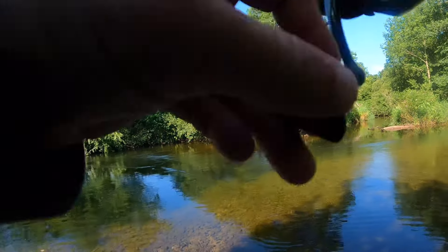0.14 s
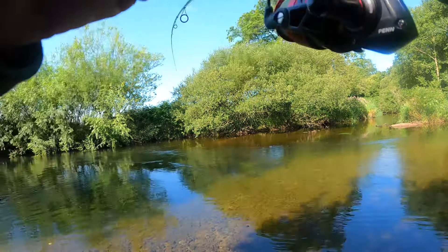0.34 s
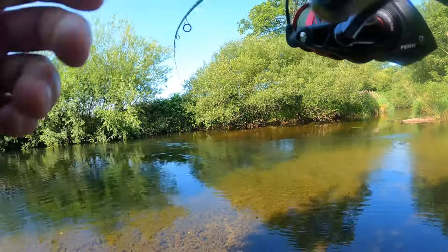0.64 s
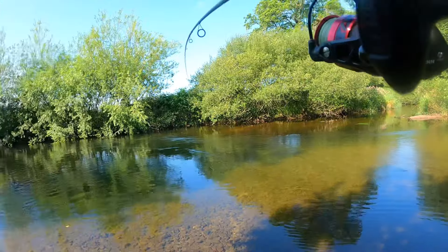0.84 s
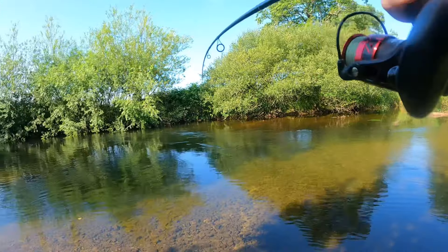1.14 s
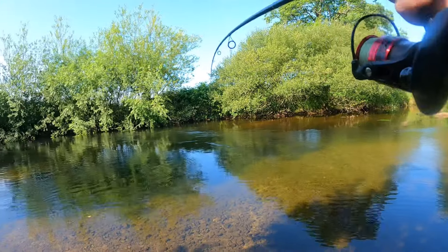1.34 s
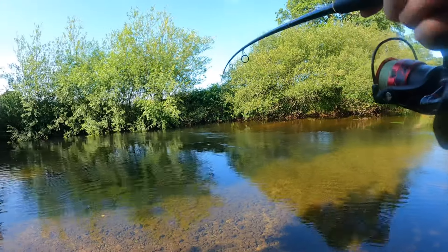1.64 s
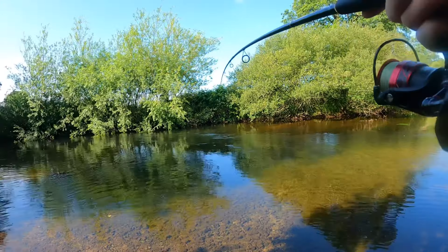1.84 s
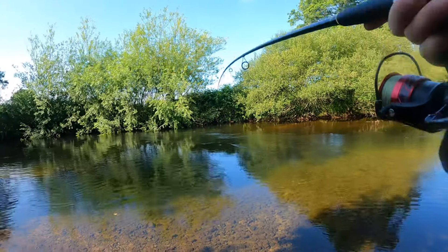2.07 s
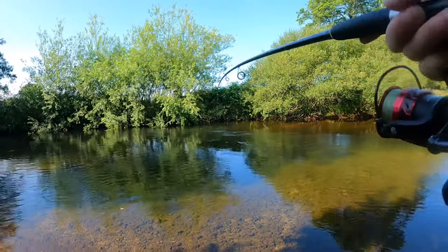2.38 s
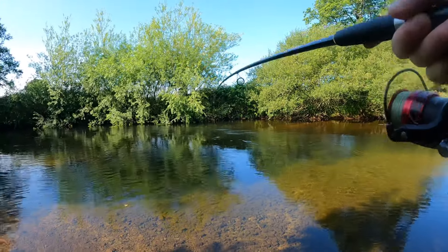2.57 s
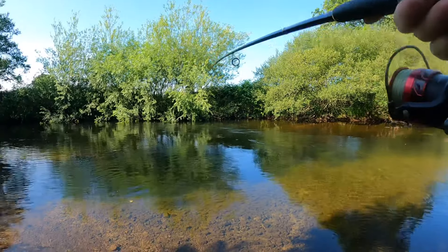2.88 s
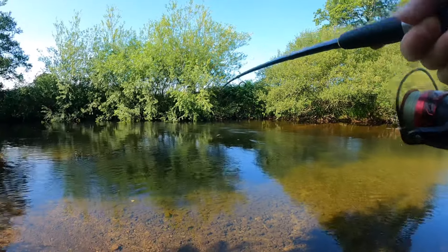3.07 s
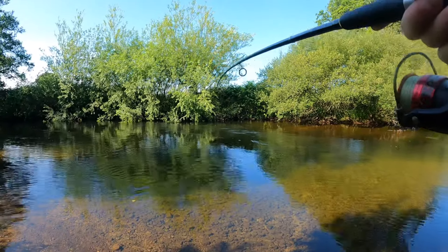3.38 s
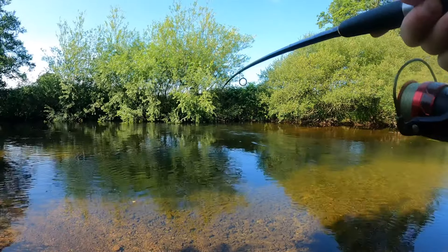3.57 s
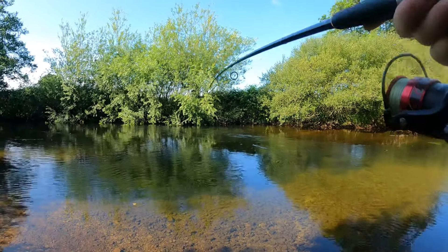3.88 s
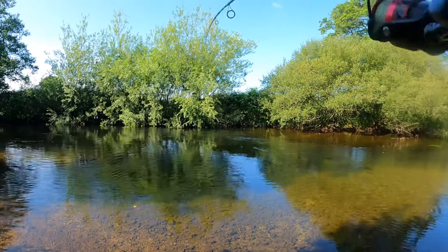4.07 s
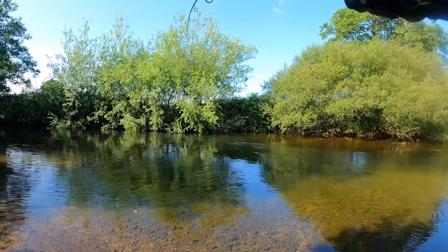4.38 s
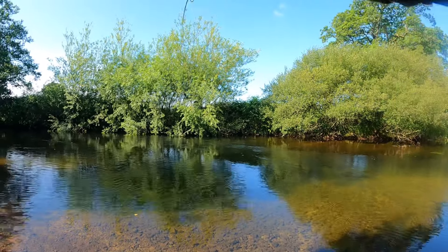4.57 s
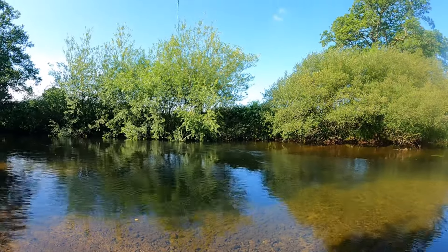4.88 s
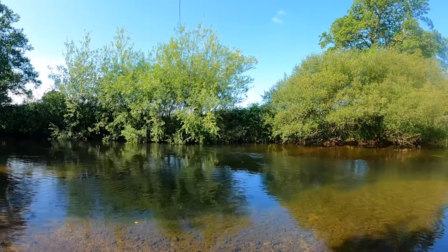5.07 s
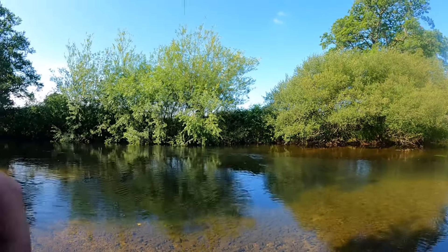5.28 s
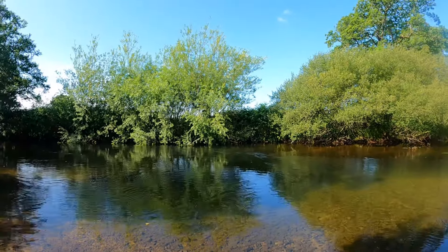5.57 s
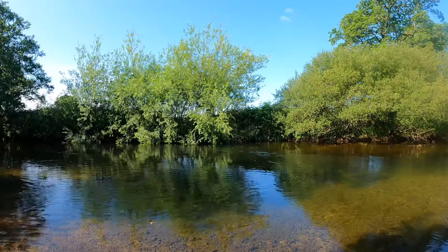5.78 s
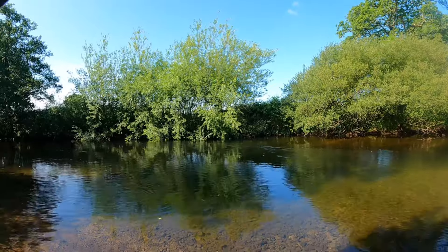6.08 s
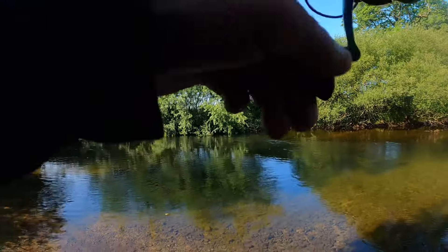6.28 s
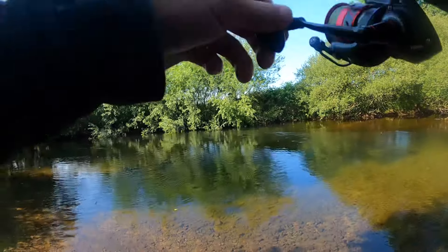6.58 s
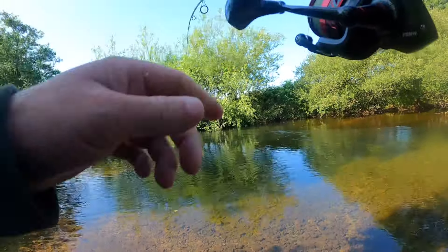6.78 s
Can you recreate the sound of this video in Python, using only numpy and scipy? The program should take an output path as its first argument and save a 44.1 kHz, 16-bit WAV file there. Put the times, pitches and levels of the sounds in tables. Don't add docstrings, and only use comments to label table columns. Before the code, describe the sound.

A fishing reel's drag clicker ratchets in bright, uneven metallic bursts, racing and slowing, pauses, then starts again over quiet river hiss.

```python
import sys
import numpy as np
from scipy import signal
from scipy.fft import rfft, irfft, next_fast_len
from scipy.io import wavfile
from scipy.ndimage import uniform_filter1d

SR = 44100
rng = np.random.default_rng(int(sys.argv[2]) if len(sys.argv) > 2 else 0)


def ratio_of_db(decibels):
    return 10 ** (np.asarray(decibels, float) / 20)


def wav_out(sig):
    wavfile.write(sys.argv[1], SR, np.round(np.clip(np.atleast_2d(sig).T, -1, 1) * 32767).astype(np.int16))


N = 305613
T = np.arange(N) / SR
CONTACT_S = 0.0005


def level(x, db):
    return x * ratio_of_db(db) / np.sqrt(np.mean(x ** 2))


def colour(x, points):
    hz, db = np.transpose(points)
    size = next_fast_len(N)
    f = np.arange(size // 2 + 1) * SR / size + 1
    gain = ratio_of_db(np.interp(np.log(f), np.log(hz), db))
    return irfft(rfft(x, size) * gain, size)[..., :N]


def band(x, hz, width_hz):
    return signal.lfilter(*signal.iirpeak(hz, hz / width_hz, SR), x)


def place(x, pan_db):
    return x * ratio_of_db(np.array([[0.5], [-0.5]]) * pan_db)


def stereo(mid, side):
    return mid + side * np.array([[1], [-1]])


def walk(rate_hz):
    hold = int(SR / rate_hz)
    levels = rng.standard_normal(N // hold + 1)
    return uniform_filter1d(np.repeat(levels, hold), hold)[:N]


def strikes(s, size):
    x = np.zeros(N, np.result_type(size))
    x[(s * SR).astype(int)] = size
    return x


def modes(s, db, table, scatter_db):
    out = 0
    contact = np.exp(-1 / (CONTACT_S * SR))
    for hz, mode_db, t60_s, pan_db in table:
        chance = rng.standard_normal((len(s), 2)).T
        blow_db = db + mode_db + scatter_db * chance[0]
        blows = strikes(s, ratio_of_db(blow_db) * np.exp(2j * chance[1]))
        turn = np.exp(2j * np.pi * hz / SR)
        decay = 1000 ** (-1 / t60_s / SR)
        push = signal.lfilter([1 - contact], [1, -contact * turn], blows)
        out = out + place(signal.lfilter([1], [1, -turn * decay], push).imag, pan_db)
    return out


def ring(s, db, hz, t60_s, pan_db):
    last = np.searchsorted(s, T) - 1
    age_s = T - s[last]
    decay = ratio_of_db(db[last] - 60 * np.abs(age_s) / t60_s)
    envelope = uniform_filter1d(np.where(last >= 0, decay, 0), size=40)
    phase = rng.uniform(0, 2 * np.pi, len(s))
    return place(envelope * np.sin(2 * np.pi * hz * age_s + phase[last]), pan_db)


def burst(s, db, ms, points, alike):
    envelope = np.zeros(N)
    age_s = np.arange(600) / SR
    shape = np.exp(-age_s / (ms / 1000)) * (1 - np.exp(-age_s / CONTACT_S))
    for start, size in zip((s * SR).astype(int), ratio_of_db(db)):
        envelope[start:start + 600] += size * shape
    mid, side = np.sign(rng.standard_normal((2, N)))
    noise = stereo(np.sqrt(alike) * mid, np.sqrt(1 - alike) * side)
    return colour(envelope * noise, points)


# (time [s], speed [teeth/s])
PULL_1 = [(0.0147, 28.1), (0.074, 39.0), (0.102, 32.3), (0.116, 36.4), (0.168, 39.5), (0.258, 94.7),
          (0.317, 91.9), (0.3756, 48.6)]
NUDGES = [
    [(.754, 20)],
    [(1.0502, 20)],
]
PULL_2 = [(1.131, 19.8), (1.172, 29.6), (1.21, 48.1), (1.291, 26.3), (1.388, 24.8), (1.498, 20.7),
          (1.5871, 37.4)]
PULL_3 = [(1.6106, 44.0), (1.674, 50.5), (1.73, 40.1), (1.759, 26.1), (1.838, 49.3), (1.9427, 18.8)]
PULL_7 = [(1.991, 53.9), (2.026, 201.9), (2.068, 86.7), (2.108, 88.3), (2.1263, 21.9)]
PULL_8 = [(2.2523, 116.6), (2.258, 94.9), (2.264, 30.2), (2.273, 179.2), (2.282, 81.3), (2.318, 78.3),
          (2.4195, 1.1)]
PULL_9 = [(2.509, 71.4), (2.531, 158.7), (2.556, 122.9), (2.56, 130.9), (2.565, 76.8), (2.617, 56.0),
          (2.668, 1.4), (2.7076, 54.5)]
PULL_10 = [(2.7766, 69.0), (2.783, 87.8), (2.79, 81.5), (2.851, 14.5)]
PULL_11 = [(3.03, 31.6), (3.081, 223.8), (3.092, 226.4), (3.1486, 22.9)]
PULL_4 = [(3.1667, 52.0), (3.198, 43.3), (3.232, 44.3), (3.297, 17.9), (3.4472, 8.8)]
PULL_5 = [(3.5488, 22.4), (3.621, 46.9), (3.7055, 62.3)]
PULL_12 = [(3.7753, 14.2), (3.785, 41.1), (3.816, 233.7), (3.876, 14.9), (3.9042, 65.7)]
PULL_6 = [(5.9475, 17.0), (6.028, 31.6), (6.074, 14.6), (6.182, 31.9), (6.216, 22.3), (6.263, 43.0),
          (6.3243, 24.3)]
PULL_13 = [(6.3907, 21.3), (6.427, 34.3), (6.471, 53.4), (6.561, 125.9), (6.623, 116.7), (6.6694, 35.9)]
RUNS = [PULL_1, *NUDGES, PULL_2, PULL_3, PULL_7, PULL_8, PULL_9, PULL_10, PULL_11,
        PULL_4, PULL_5, PULL_12, PULL_6, PULL_13]


def snaps():
    rows = []
    for number, run in enumerate(RUNS):
        s, speed = np.transpose(run)
        t = np.arange(s[0], s[-1] + 1 / SR, 1 / SR)
        teeth = np.cumsum(np.interp(t, s, speed)) / SR
        snap_s = np.interp(np.arange(round(teeth[-1]) + 1), teeth, t)
        rows += [(at, number, np.interp(at, s, speed)) for at in snap_s]
    return np.transpose(rows)


# (crack [dB], low ring [dB], high ring [dB], body knock [dB])
GRIP = [(-21, -40.5, -50, -38.0), (-19, -35.5, -51, -41), (-18, -33.5, -60, -39.5),
        (-23, -40.5, -46, -37.5), (-23, -41.5, -49.5, -38.5), (-24, -41.0, -45.5, -36),
        (-22.5, -44.5, -50.5, -37.5), (-23.5, -40.0, -51, -40), (-26, -41, -51, -41.5),
        (-23.5, -43.5, -45, -40.5), (-23, -41.5, -45, -45.5), (-23.5, -42, -47.0, -36.5),
        (-23.0, -37, -43, -39.5), (-24, -41, -53, -41), (-21.5, -46.5, -47, -41.5)]
SPEED_DB = (1.1, 2.6, 2.4, 1.7)
SCATTER_DB = (1.0, 3.5, 3.5, 1.5)
# (slowest that matters, reference, fastest) [teeth/s]
SPEED_RANGE = (33, 50, 300)
# (crack [dB], body knock [dB], cap ring [dB])
TEETH = [(-2.0, -0.1, -2.2), (-0.3, -0.6, -0.3), (1.0, -0.2, 1.9), (1.8, -0.4, 0.2), (0.7, -0.1, -2.8),
         (-0.4, 0.1, -2.6), (-3.7, 1.4, -2.4), (-1.7, 2.5, 2.0), (-1.7, 2.3, 3.8), (1.3, 1.6, 2.6),
         (1.8, -1.3, 1.9), (1.7, -2.6, 2.4), (2.9, -1.2, 1.6), (0.2, -2.1, -2.1), (-1.7, 0.6, -4.0)]
# (frequency [Hz], level [dB])
CRACK = [(600, -11), (1500, -5.5), (3000, -2), (5500, 4.5), (8500, -4.5), (12500, -9), (14500, -25),
         (16500, -54)]
# (frequency [Hz], level under crack [dB], t60 [s], left minus right [dB])
CAP = [(5025, -5.5, 0.014, -1), (6264, -1.5, 0.0037, -2), (3990, -14, 0.0025, -3.5), (7505, -3, 0.0014, 2),
       (9110, -17, 0.0032, -3), (10520, -17, 0.0044, 10.5)]
# (frequency [Hz], level under crack [dB], t60 [s], left minus right [dB])
SPOOL_TOP = [(10775, -30.5, .085, 1.), (13230, -40, .07, 2.)]
# (frequency [Hz], level under body knock [dB], t60 [s], left minus right [dB])
BODY = [(1660, 1.5, 0.017, -1.5), (1785, -9, 0.053, 2), (941, -22.5, 0.21, -0.5), (2520, -13, 0.004, 1)]


def ratchet():
    s, run, speed = snaps()
    slowest, reference, fastest = SPEED_RANGE
    haste = np.log2(np.clip(speed, slowest, fastest) / reference)
    memory = 0.46
    built = signal.lfilter([1 - memory], [1, -memory], haste)
    haste = np.transpose([haste, built, built, haste])
    chance = rng.standard_normal((len(s), 4))
    db = np.array(GRIP)[run.astype(int)] + haste * SPEED_DB + chance * SCATTER_DB
    base_db, low_db, high_db, body_db = db.T
    tooth_db, knock_db, cap_db = np.array(TEETH)[np.arange(len(s)) % len(TEETH)].T
    crack_db = base_db + 1.3 * tooth_db + 2.0

    crack = burst(s, crack_db + 11.0, 0.38, CRACK, alike=0.91)
    rattle = burst(s, crack_db - 12, 2.6, CRACK, alike=0.83)
    low = ring(s, low_db + 3.0, hz=4306, t60_s=0.13, pan_db=-0.059)
    high = ring(s, high_db + 2.5, hz=6640, t60_s=0.25, pan_db=0.0)
    cap = modes(s, base_db + cap_db, CAP[:1], scatter_db=4.0)
    cap = cap + modes(s, crack_db, CAP[1:], scatter_db=2.5)
    top = modes(s, crack_db, SPOOL_TOP, scatter_db=4.5)
    body = modes(s, body_db + knock_db, BODY, scatter_db=2.5)
    return crack + rattle + low + high + cap + top + body


# (time [s], moving resonance [Hz], level [dB])
RUB = [(0.061, 620.2, -58), (.15, 950, -44), (0.198, 1546, -44.5), (.28, 1000, -46.5), (.35, 700, -56),
       (0.419, 695.6, -110),
       (6.031, 904.4, -70), (6.08, 954, -50), (6.121, 1653, -52), (6.182, 1981, -46),
         (6.271, 1616, -50.5), (6.351, 1602, -53),
       (6.399, 1500, -42.5), (6.449, 1637, -45.5), (6.549, 1484, -50), (6.659, 1620, -58)]


def drag_rub():
    s, hz, db = np.transpose(RUB)
    turns = np.cumsum(np.interp(T, s, hz)) / SR
    parts = [(turns, 130.0, 0), (2250 * T, 90.0, -9), (1500 * T, 900.0, -6), (3800 * T, 900.0, -9)]
    out = 0
    for cycles, width_hz, part_db in parts:
        slips = signal.lfilter(*signal.butter(2, width_hz, fs=SR), rng.standard_normal((2, N)))
        angle = 2 * np.pi * cycles
        wave = slips[0] * np.cos(angle) + slips[1] * np.sin(angle)
        out = out + level(wave * ratio_of_db(3.5 * walk(50)), part_db)
    return out * ratio_of_db(np.interp(T, s, db, left=-90, right=-90) + 0.5)


# (time [s], tick [dB], thud [dB])
KNOCKS = [(0.4968, -26.5, -31), (0.532, -26.5, -33.5), (0.541, -25.5, -52), (0.544, -41, -38),
          (0.555, -42, -39), (0.58, -45, -39), (1.15, -33, -47), (2.067, -29, -32.5), (2.325, -37, -30.5),
          (2.5802, -28, -31.5), (2.8441, -28.5, -34.5), (2.8554, -35, -36), (2.9436, -46.5, -44),
          (3.8643, -30.5, -30), (3.8728, -30, -40), (3.9503, -35.5, -46), (3.973, -32, -39),
          (3.977, -37, -42), (5.263, -47, -63), (5.2915, -48, -39.5), (5.6949, -36.5, -32.5),
          (5.7001, -32, -32.5), (5.7056, -43, -34.5), (5.778, -35, -39.5), (5.7846, -36.5, -35),
          (5.7872, -30, -36.5), (5.8306, -19, -27), (6.234, -23, -30.5), (6.383, -36, -33.5),
          (6.7502, -44, -51)]


def knocks():
    s, tick_db, thud_db = np.transpose(KNOCKS)
    tick_hz_db = [(1500, -31.0), (3000, 5.0), (4200, 4.5), (6500, 1.0), (9500, -17.0), (14000, -32.0)]
    thud_hz_db = [(300, -7), (1000, -2.0), (1700, 1), (2500, -1.5), (4000, -45)]
    tick = burst(s, tick_db + 13, 0.68, tick_hz_db, alike=0.87)
    thud = burst(s, thud_db + 10.5, 4.24, thud_hz_db, alike=0.97)
    return tick + thud + modes(s, tick_db, [(4260, 1.2, 0.0071, 0.0)], scatter_db=1)


# (frequency [Hz], density [dB per Hz])
RIVER = [(110, -16), (160, -4), (270, 0), (500, -0.5), (1000, -4), (1700, -11), (2500, -19.5), (3400, -29),
         (4600, -27.5), (6500, -31), (8500, -44), (13500, -50), (14300, -65)]
# (frequency [Hz], left minus right [dB])
RIVER_PAN = [(150, -4.5), (400, 1.5), (1300, 8), (2400, 6), (4400, 2.5)]


def river(db, hiss_db):
    out = 0
    pan_hz, pan_db = np.transpose(RIVER_PAN)
    for hz in 141 * 2 ** np.arange(0, 6.8, 0.5):
        edges_hz = hz * 2 ** np.array([-0.25, 0.25])
        sos = signal.butter(2, edges_hz, "band", fs=SR, output="sos")
        high = np.clip(np.log2(hz / 900) / 2.2, 0, 1)
        gain_db = (1 - high) * db + high * (hiss_db - 55) + (2.4 - high) * walk(6)
        mid, side = signal.sosfilt(sos, rng.standard_normal((2, N)))
        pair = stereo(mid, (0.3 + 0.18 * high) * side)
        out = out + place(ratio_of_db(gain_db) * pair, np.interp(np.log(hz), np.log(pan_hz), pan_db))
    return colour(out, RIVER) * ratio_of_db(15.5)


# (time [s], level [dB])
THUMPS = [(0.28, -55), (0.39, -61), (1.75, -60), (3.07, -62), (5.91, -60), (6.25, -61)]


def wind():
    rumble_hz_db = [(12, -15.0), (25, 2), (40, -9), (60, -7.5), (100, -20.5), (200, -69.5)]
    mid, side = colour(rng.standard_normal((2, N)), rumble_hz_db)
    rumble = ratio_of_db(6.1 * walk(9.4)) * level(stereo(mid, 0.38 * side), -74)
    beats_s = np.arange(0.187, N / SR, 0.4265)
    beats_db = -57 + 2.1 * rng.standard_normal(len(beats_s))
    s, db = np.transpose(THUMPS + list(zip(beats_s, beats_db)))
    age_s = np.arange(-2000, 2001) / SR
    thump = np.exp(-(age_s / 0.017) ** 2) * np.sin(2 * np.pi * 41 * age_s)
    return rumble + signal.fftconvolve(strikes(s, ratio_of_db(db + 1.5)), thump, "same")


# (middle [s], half length [s], centre [Hz], width [Hz], level [dB])
SWELLS = [(4.12, .09, 4500, 700, -65.5), (5.05, 0.092, 5300, 400, -76), (5.28, .05, 4700, 300, -67),
          (5.55, 0.16, 4200, 450, -67.5), (4.5, .05, 5800, 1600, -68), (6.565, 0.039, 2540, 620, -46),
          (0.24, .08, 150, 180, -59.5), (.55, 0.045, 90, 70, -65), (4.65, 0.015, 2230, 1400, -60),
          (3.25, .04, 81, 80, -66.5), (5.8, 0.04, 114, 120, -59.5), (6.4, 0.086, 170, 140, -58.5),
          (1.45, .12, 283, 83, -61.5), (4.0, .2, 270, 99, -62)]


def swells():
    out = np.zeros((2, N))
    for s, half_s, hz, width_hz, db in SWELLS:
        span = slice(int((s - 2 * half_s) * SR), int((s + 2 * half_s) * SR))
        noise = rng.standard_normal((2, 40000))
        mid, side = band(band(noise, hz, width_hz), hz, width_hz)[:, :span.stop - span.start]
        shape = np.exp(-((T[span] - s) / half_s) ** 2) * ratio_of_db(3.2 * walk(40)[span])
        out[:, span] += shape * level(stereo(mid, 0.22 * side), db)
    return out


# (time [s], length [s], start [Hz], middle [Hz], end [Hz], level [dB])
BIRDS = [
    (4.108, .075, 4250, 4950, 4500, -62),
    (4.33, .07, 4600, 4500, 4000, -63),
    (4.635, .02, 2500, 2200, 1900, -63),
]


def birds():
    out = np.zeros(N)
    for s, length_s, start_hz, middle_hz, end_hz, db in BIRDS:
        u = np.clip((T - s) / length_s, 0, 1)
        hz = np.interp(u, [0, 0.35, 1], [start_hz, middle_hz, end_hz]) + 40 * walk(180)
        tone = np.sin(2 * np.pi * np.cumsum(hz) / SR)
        out += ratio_of_db(db + 1.9 * walk(73)) * np.sin(np.pi * u) ** 0.5 * tone
    return place(out, 3.7)


# (time [s], river [dB], leaf hiss above -55 dB [dB])
SCENE = [(0, -66.5, 25.5), (.31, -61, 15), (.91, -60, 3), (1.41, -60, 11), (3.51, -63, 9),
         (4.01, -60.5, 6.5), (4.56, -59, 7), (4.73, -62, 1), (5.11, -61, 8), (5.61, -58, 10),
         (6.41, -60, 11.5), (6.92, -57.5, 8)]


def scene():
    s, *columns = np.transpose(SCENE)
    river_db, hiss_db = (np.interp(T, s, c) for c in columns)
    reel = place(ratchet() + drag_rub() + knocks(), -0.17)
    reel = signal.lfilter(*signal.butter(2, 260.0, "high", fs=SR), reel)
    reel[0] -= 0.61 * band(reel[0], 2740.0, 4100.0)
    return reel + river(river_db, hiss_db) + wind() + swells() + birds()


def roll_off(x):
    return signal.sosfilt(signal.butter(12, 16490, fs=SR, output="sos"), x)


def record(dry):
    heard = colour(dry, [(13500, 2), (14500, 1.5), (16000, -18), (17000, -26)])
    return roll_off(heard)


dry = scene()
out = record(dry)
wav_out(out)
```